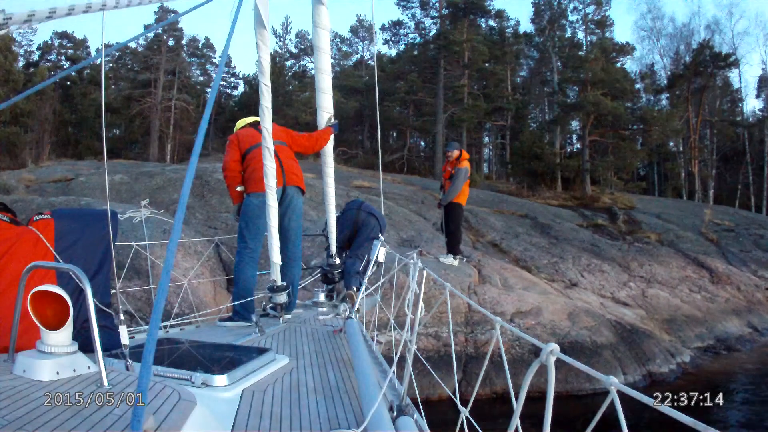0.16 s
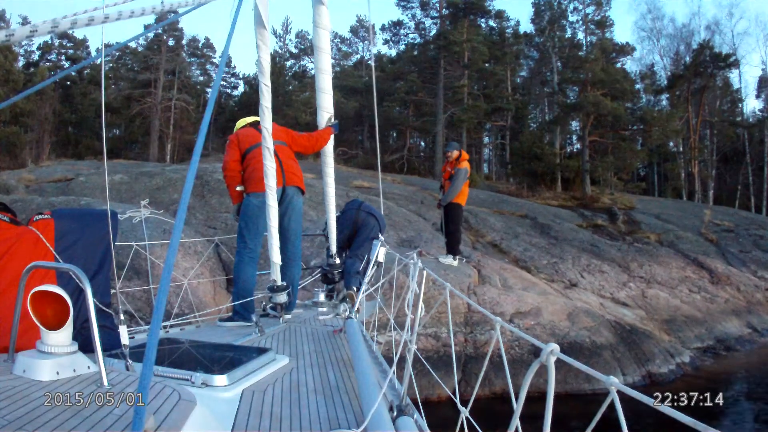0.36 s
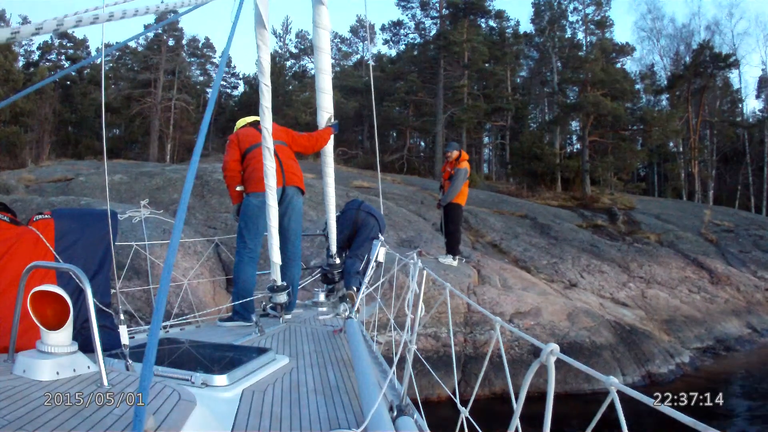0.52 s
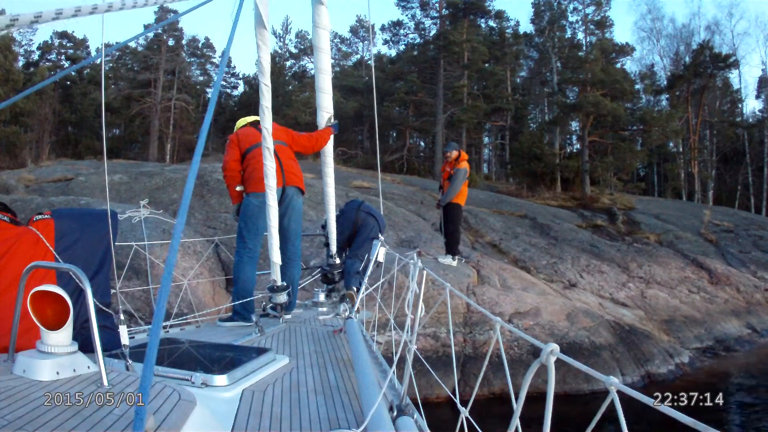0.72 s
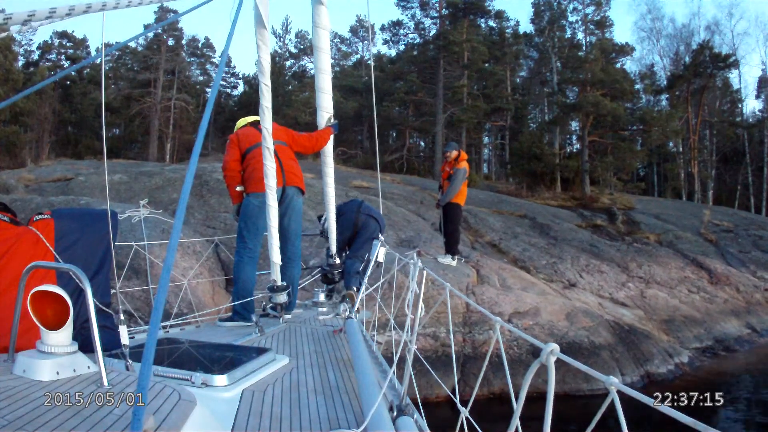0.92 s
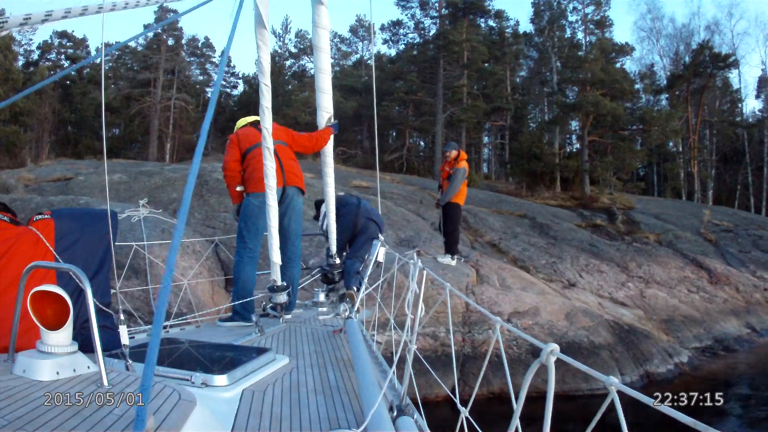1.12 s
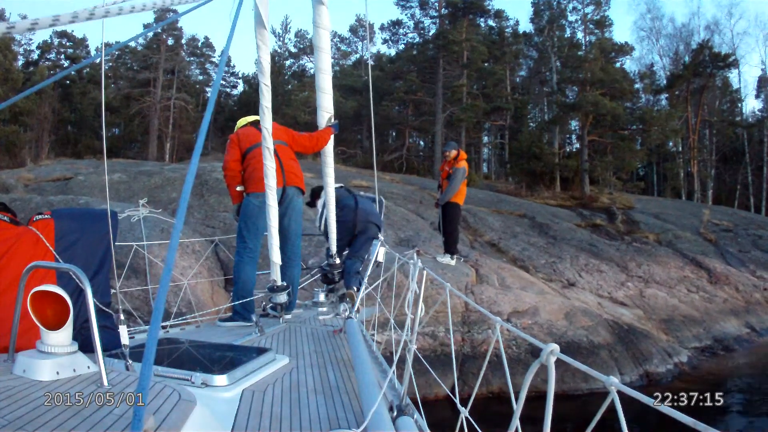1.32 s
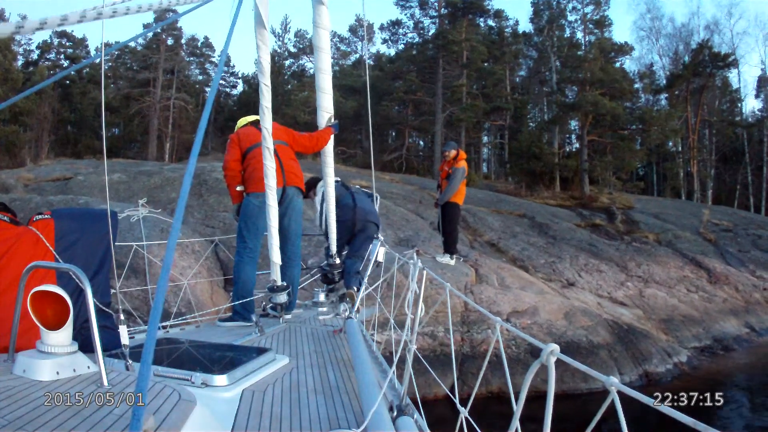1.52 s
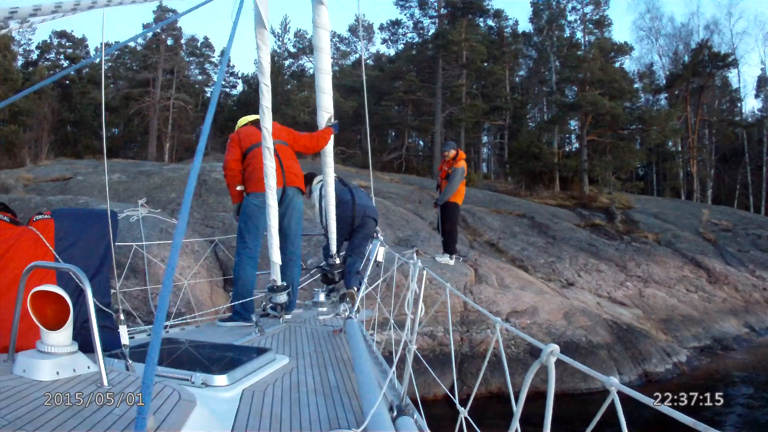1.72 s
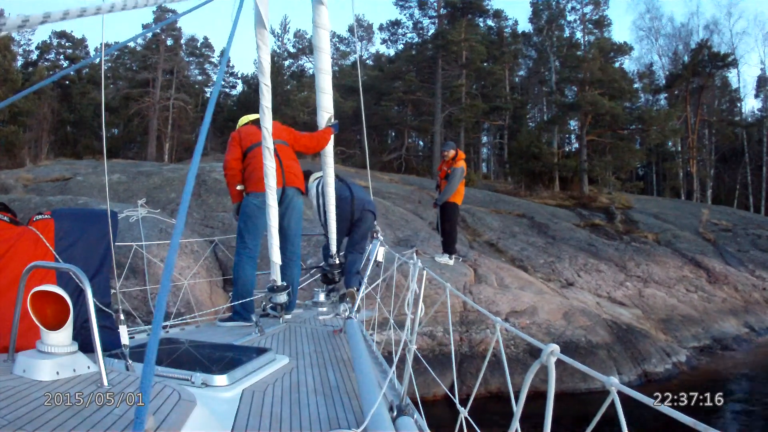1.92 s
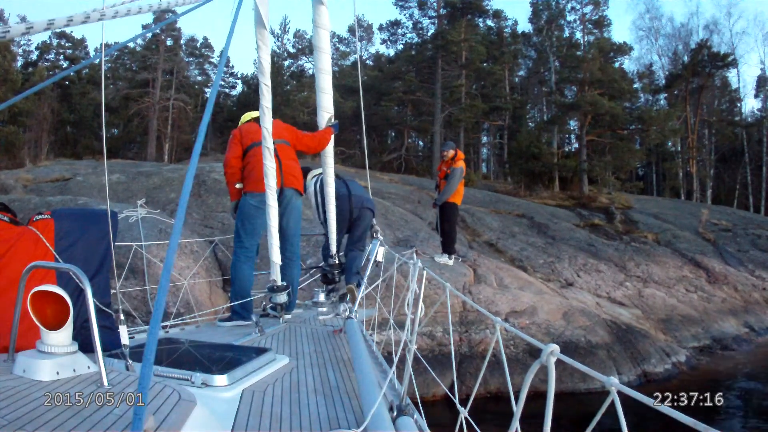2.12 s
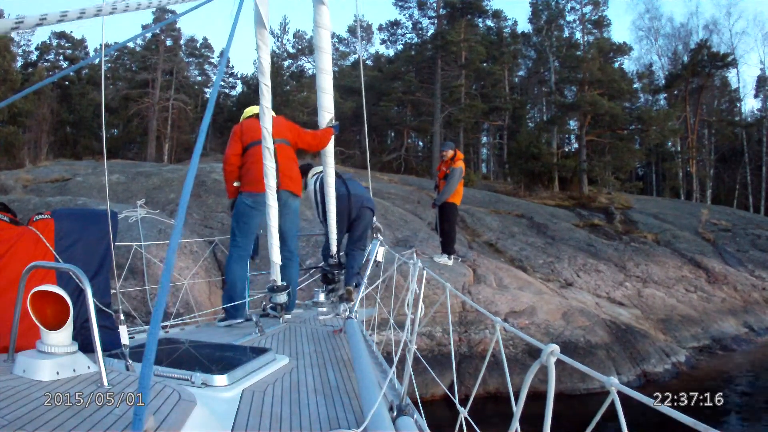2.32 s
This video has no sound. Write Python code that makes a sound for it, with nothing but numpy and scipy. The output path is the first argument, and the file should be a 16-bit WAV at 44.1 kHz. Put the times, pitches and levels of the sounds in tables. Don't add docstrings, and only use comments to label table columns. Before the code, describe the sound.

Loose gear clatters against a yacht's metal spar: a dense burst of hard knocks and low thuds, then scattered ringing taps that weaken to near quiet, with low water rumble outdoors and slight hiss from a camera fixed aboard.

```python
import sys
import numpy as np
from scipy import signal
from scipy.fft import rfft, irfft
from scipy.io import wavfile
from scipy.ndimage import uniform_filter1d

SR = 44100
rng = np.random.default_rng(int(sys.argv[2]) if len(sys.argv) > 2 else 0)


def makeup_ratio(level_db):
    decades = np.asarray(level_db, float) / 20
    return 10 ** decades


def wrap_up_sound(samples):
    columns = np.atleast_2d(samples).T
    tamed = np.clip(columns, -1, 1)
    steps = np.round(tamed * 32767).astype(np.int16)
    wavfile.write(sys.argv[1], SR, steps)


N = 103635
T = np.arange(N) / SR
RING_HZ = 1562

# f/Hz, level/dB, t60/s
SPAR_MODES = [(617.8, -6, 0.11), (716, -47, 0.49), (803.6, 3, 0.056), (1191, -16, 0.12), (1296, -10, 0.1),
              (1450, -15, 0.13), (1659, 1, 0.025), (1765, -13, 0.16), (1897, -3.5, 0.059),
              (2958, -29, 0.11), (3146, -16.5, 0.03), (3426, -22, 0.034), (4790, -34.5, 0.05),
              (5330, -33, 0.089)]
# f/Hz, width/Hz, level/dB
HULL_RESONANCES = [(249.3, 30.6, -2.5), (346, 48, -2.5), (580, 46, 2), (622.2, 57, 2.5), (686.3, 63, -1),
                   (779, 55, -0.5), (966, 210, -7.5), (1277, 130, -16.5), (1586, 230, -8), (1788, 95, -9),
                   (1956, 98, -15), (3306, 200, -24), (5700, 550, -37)]
# t/s, level/dB
ROCKING = [
    (0.1, 4.5),
    (.4, 9),
    (.9, 8),
    (1.3, -0.5),
    (2.35, 0.5),
]


def level(x, db):
    return x * makeup_ratio(db) / np.sqrt(np.mean(x ** 2))


def curve(table):
    return makeup_ratio(np.interp(T, *np.array(table, float).T))


def sine(hz, t):
    return np.sin(2 * np.pi * hz * t)


def fade(t, t60):
    return makeup_ratio(-60 * t / t60)


def body(x, peaks, bright_db=0, above_hz=1000):
    out = 0
    for hz, width, db in peaks:
        b, a = signal.iirpeak(hz, hz / width, SR)
        ringing = signal.lfilter(b, a, signal.lfilter(b, a, x))
        gain = makeup_ratio(db + bright_db * (hz > above_hz)) / np.sqrt(width)
        out = out + gain * ringing
    return out


def coloured(points):
    hz, db = np.array(points, float).T
    f = np.maximum(np.fft.rfftfreq(N, 1 / SR), 1)
    edge = np.minimum(f / hz[0], 1) ** 2 * np.minimum(hz[-1] / f, 1) ** 2
    gain = makeup_ratio(np.interp(np.log(f), np.log(hz), db)) * edge
    return irfft(rfft(rng.standard_normal(N)) * gain, N)


def walk(rate):
    k = int(SR / rate)
    w = uniform_filter1d(uniform_filter1d(rng.standard_normal(N), k), k)
    return (w - w.mean()) / w.std()


def add(out, s, x):
    i = int(s * SR)
    out[i:i + len(x)] += x[:N - i]


def taps():
    # t/s, peak level/dB, long ring/dB, brightness/dB, crack/dB
    struck = [(0.116, -28.5, -1.5, -4, -3.5), (0.2213, -5, -4, -25, -7), (0.379, -5, -20, -8.5, -5.5),
              (0.55, -12.5, 2, 4.5, 3.5), (0.67, -32, 11, -1.5, -11), (0.69, -26, -9, 8.5, 9.5),
              (0.713, -9, 1.5, 4, 5), (0.835, -30, -15, -8, -1), (0.889, -34.5, -1, -13, 0),
              (1.039, -17, 5, 1.5, 2), (1.15, -25, -1, 0, -4), (1.2303, -14, -1, 3.5, 5),
              (1.406, -21, 1, 2.5, -4), (1.592, -21, -1.5, 2, 0.5), (1.657, -21, -2, 1, -5),
              (1.798, -27, 0, -34, -8), (1.806, -24.5, 1.5, 3.5, -3), (1.853, -27.5, -18, -8.5, -1.5),
              (2.011, -38.5, -1.5, -8, 0.5), (2.182, -60.5, 21.5, 3, 0), (2.225, -39.5, -5, -4.5, 2),
              (2.322, -36, 1, -10, -15)]
    # t/s, peak level/dB, long ring/dB, brightness/dB
    brushes = [
        (0.34, -42, 21.5, -9.5),
        (0.436, -34.5, 25.5, -2.5),
        (.969, -51, 19, 2),
        (.985, -46.5, -18, 12),
    ]
    # f/Hz, width/Hz, level/dB
    crack_peaks = [(3204, 420, 5), (4160, 770, -5), (5505, 160, -7.5), (6230, 730, -12.5)]
    contact_s, choke_t60_s, ring_t60_s = 0.0005, 0.03, 0.3
    ring_base_db, partner_hz, partner_db = -8.5, 1579, -17
    tail_t60_s, tail_db, crack_t60_s, crack_base_db = 0.11, -3, 0.088, 9.5
    out, t = np.zeros(N), T[:SR // 2]
    rows = struck + [(*row, row[-1]) for row in brushes]
    for s, db, ring_db, bright_db, crack_db in rows:
        modes = 0
        for hz, mode_db, t60 in SPAR_MODES:
            lift_db = crack_db if hz > 2500 else bright_db if hz > 1000 else 0
            scatter, detune = rng.standard_normal(2)
            gain = makeup_ratio(mode_db + 2 * scatter + lift_db)
            modes = modes + gain * sine(hz * (1 + 0.0052 * detune), t) * fade(t, t60)

        free_s = min([row[0] - s for row in rows if row[0] > s], default=1)
        choke = fade(np.maximum(t - free_s, 0), choke_t60_s)
        pair = sine(RING_HZ, t) + makeup_ratio(partner_db) * sine(partner_hz, t)
        ring = makeup_ratio(ring_base_db + ring_db) * pair * fade(t, ring_t60_s) * choke
        contact = (1 - np.exp(-t / contact_s)) ** 2 / 2

        grit = rng.standard_normal(len(t))
        tail = body(grit * fade(t, tail_t60_s), HULL_RESONANCES[2:-2], bright_db + 17.5)
        impact = makeup_ratio(14) * (t == 0)
        crack = body((grit + impact) * fade(t, crack_t60_s), crack_peaks)
        x = (modes + ring) * contact + makeup_ratio(tail_db) * 10 * tail
        add(out, s, makeup_ratio(db) * (x + makeup_ratio(crack_base_db + crack_db) * crack))
    return out


def knocks():
    # t/s, peak level/dB, f/Hz, t60/s, upper modes/dB
    gear = [(.2245, -3, 788, 0.034, -13.5), (.232, -15, 732, 0.05, -2), (.241, -11, 773, 0.038, -6),
            (.255, -20, 694, 0.085, -6), (.272, -18.5, 646, 0.058, -18), (.295, -18, 746, 0.079, -9.5),
            (.325, -29.5, 630, 0.033, -8), (.374, -1.5, 910, 0.013, -13), (.386, -3.5, 882, 0.019, -8),
            (.393, -14, 630, 0.028, -6), (.401, -6.5, 579, 0.038, -14.5), (.407, -11, 772, 0.08, -25),
            (.412, -19.5, 1906, 0.079, -11), (.415, -6, 619, 0.033, -18), (.46, -16, 734, 0.033, -19),
            (.469, -21, 575, 0.12, -19.5), (.476, -31.5, 764, 0.1, -17), (.532, -21, 763, 0.053, -16),
            (.882, -31.5, 684, 0.089, -11.5), (.945, -41.5, 710, 0.083, -6.5), (1.74, -49.5, 684, 0.11, -7),
            (2.16, -50.5, 980, 0.13, -17), (2.285, -51, 730, 0.079, -14), (2.3, -46, 846, .07, -18),
            (2.314, -35, 987, 0.14, -17), (2.331, -39, 760, 0.21, -18), (2.338, -41, 1010, 0.029, -20)]
    rise_s, spread, scatter_db = 0.0015, 0.03, 4
    out, t = np.zeros(N), T[:SR // 8]
    upper = np.array([mode for mode in SPAR_MODES if mode[0] > 1000])
    for s, db, hz, t60, upper_db in gear:
        detune, scatter = rng.standard_normal((2, len(upper)))
        pair = sine(hz, t) + 0.5 * sine(hz * (1 + 3 * spread * detune[0]), t)
        gains = makeup_ratio(upper_db + upper[:, 1] + scatter_db * scatter)
        upper_hz = upper[:, 0] * (1 + spread * detune)
        x = pair + gains @ sine(upper_hz[:, None], t)
        add(out, s, makeup_ratio(db) * x * fade(t, t60) * (1 - np.exp(-t / rise_s)))
    return out


def clamp(x):
    # f/Hz, width/Hz
    dead_bands = [(430, 98), (1040, 243), (2450, 640)]
    for hz, width in dead_bands:
        b, a = signal.iirnotch(hz, hz / width, SR)
        x = signal.lfilter(b, a, x)
    return x


def bursts(events, peaks, length, hit_db, above_hz):
    out, t = np.zeros(N), T[:length]
    for s, db, t60, bright_db in events:
        size = rng.exponential(size=length // 128 + 1)
        unevenness = makeup_ratio(2 * (np.repeat(size, 128)[:length] - 1))
        grit = rng.standard_normal(length) * unevenness * fade(t, t60)
        grit[0] += makeup_ratio(hit_db)
        add(out, s, makeup_ratio(db + 30) * body(grit, peaks, bright_db, above_hz))
    return out


def blows():
    # t/s, level/dB, t60/s, brightness/dB
    rattles = [(.001, -26.5, 0.39, -14), (.224, -10.5, 0.11, -2.5), (.258, -15.5, 0.38, -1),
               (.368, -9, 0.15, -3.5), (.385, -15, 0.51, 0.5), (.46, -14.5, 0.39, -6),
               (.685, -17, 0.29, -24), (.89, -35, 0.37, -19), (1.31, -45, 0.32, 14.5),
               (1.556, -49, 0.26, 10), (1.87, -47.5, 0.51, 17), (2.14, -59, 0.39, 1),
               (2.303, -51, 0.15, -5)]
    return bursts(rattles, HULL_RESONANCES, SR // 2, hit_db=14, above_hz=1000)


def mount():
    # t/s, lower mode level/dB, upper mode level/dB, two bracket mode levels/dB
    jolts = [(.003, -28, -50, -29.5, -48), (0.059, -24.5, -26.5, -28, -54), (.222, -19, -14.5, -24, -36),
             (.252, -15, -14, -25, -30), (0.359, -16.5, -51, -30.5, -18.5), (.394, -13.5, -6, -18.5, -16),
             (.432, -13.5, -18.5, -27, -23), (0.478, -22.5, -8, -29.5, -29),
             (0.544, -35, -46, -38.5, -26.5), (.63, -18, -24, -33, -49), (.685, -14.5, -27, -31.5, -54),
             (.715, -16, -27, -43, -52), (0.746, -16, -27.5, -38.5, -33), (0.876, -19.5, -33.5, -39, -46.5),
             (1.038, -35.5, -45, -46, -47), (1.2, -27, -44, -58, -68), (1.25, -27, -37, -49, -56),
             (1.387, -33.5, -39, -47, -45.5), (1.6, -35.5, -35.5, -49.5, -45.5),
             (1.801, -30, -47.5, -49.5, -44.5), (1.951, -42, -46, -79, -55.5)]
    # f/Hz, t60/s
    modes = [(134, .35), (161, 0.28), (276, 0.43), (355, 0.17)]
    rise_s = 0.0081
    out, t = np.zeros(N), T[:SR]
    for s, *dbs in jolts:
        for sign, db, (hz, t60) in zip((1, -1, 1, -1), dbs, modes):
            x = sine(hz, t) * fade(t, t60) * (1 - np.exp(-t / rise_s))
            add(out, s, sign * makeup_ratio(db) * x)
    return out


def ticks():
    # t/s, level/dB, t60/s, level above 8 kHz/dB
    small_hits = [(.001, -45, 0.027, 5), (.155, -66, 0.076, 15), (.236, -38.5, 0.064, -4),
                  (.339, -46, 0.049, 4), (.399, -37.5, 0.012, 1.5), (.437, -35, 0.03, -12),
                  (.49, -45.5, 0.045, 2), (.503, -38.5, 0.061, 0.5), (.67, -46, 0.079, 4),
                  (.772, -49, .04, -2), (.836, -50, 0.033, -13), (.862, -53.5, .05, -8),
                  (.877, -54, 0.025, 1), (.969, -54, .03, -8), (.984, -51, 0.023, -2),
                  (1.014, -55.5, 0.097, -6), (1.48, -64, 0.068, 13), (1.84, -64, .08, 16),
                  (2.09, -78, 0.038, 4)]
    # f/Hz, width/Hz, level/dB
    shell = [(3110, 240, 9), (4400, 540, 6.5), (5000, 910, 7), (6040, 1200, -0.5), (9570, 890, 1.5),
             (13000, 2200, -8)]
    return bursts(small_hits, shell, SR // 8, hit_db=4, above_hz=8000)


def shaking():
    # t/s, level/dB
    trembling = [
        (0.0, -35),
        (.2, -64),
        (0.33, -35.5),
        (.6, -49.5),
        (.95, -45),
        (1.15, -54.5),
        (1.55, -54.5),
        (1.9, -59.5),
        (2.35, -67.5),
    ]
    # t/s, level/dB
    swaying = [
        (0, -34),
        (.17, -65),
        (.33, -41),
        (.9, -42),
        (1.12, -50.5),
        (1.3, -47),
        (1.55, -52.5),
        (1.85, -56),
        (2.35, -62),
    ]
    # f/Hz, width/Hz, level/dB
    sway_peaks = [(95, 8.5, -9), (133.8, 26, -4.5), (160, 16, -6.5)]
    hull_noise = rng.standard_normal(N) * makeup_ratio(3.5 * walk(20))
    sway_noise = rng.standard_normal(N) * makeup_ratio(0.52 * walk(48))
    hull = level(body(hull_noise, HULL_RESONANCES + [(RING_HZ, 16, -9)], -1), 1)
    sway = level(body(sway_noise, sway_peaks), 9)
    return hull * curve(trembling) + sway * curve(swaying)


def water_rumble():
    # f/Hz, level/dB per Hz
    spectrum = [(20, 4), (45, -3), (70, -0.5), (100, -6), (165, -13), (200, -25.5), (300, -18.5),
                (400, -28.5)]
    rumble = level(coloured(spectrum), -49.5) * makeup_ratio(0.53 * walk(5.3))
    swell = level(body(rng.standard_normal(N), [(28.1, 14, 0)]), -59)
    return (rumble + swell) * curve(ROCKING)


def recorder_hiss():
    # f/Hz, level/dB per Hz
    spectrum = [(200, -11), (260, -16.5), (438, -10.5), (896, -11), (937, -7.5), (1290, -10.5),
                (2480, -14.5), (2720, -14), (15200, -17.5)]
    return level(coloured(spectrum), -61) + makeup_ratio(-75) * sine(13950, T)


def side_noise():
    broad = coloured([(300, -7.0), (4000, -5), (9000, -3.5), (14000, -6.5)])
    low = coloured([(30, 2.5), (70, 14), (300, -44.5)])
    return level(broad, -77) + level(low, -68)


def scene():
    mid = clamp(taps() + knocks()) + blows() + mount() + ticks() + shaking()
    mid = mid + water_rumble() + recorder_hiss()
    side = side_noise() + makeup_ratio(-48) * mid * walk(40)
    return np.array([mid + side, mid - side])


def band_limit(x):
    return signal.sosfilt(signal.butter(12, 15310, fs=SR, output="sos"), x)


def record(dry):
    low_pass = signal.ellip(10, 0.2, 80, 15300, fs=SR, output="sos")
    mix = signal.sosfilt(low_pass, dry)
    return band_limit(mix)


dry = scene()
out = record(dry)
wrap_up_sound(out)
```